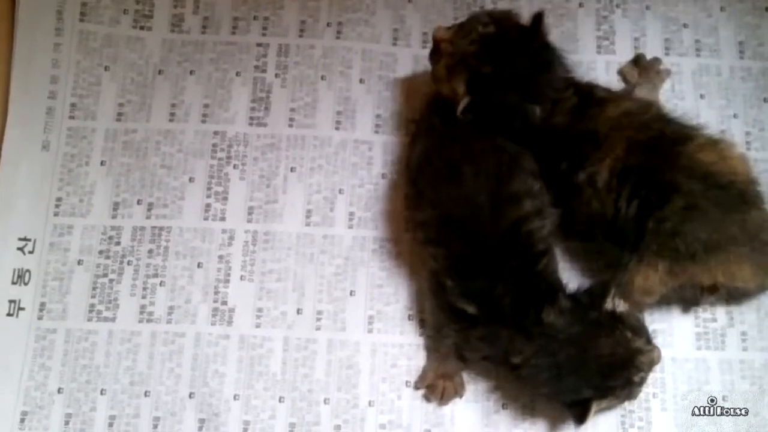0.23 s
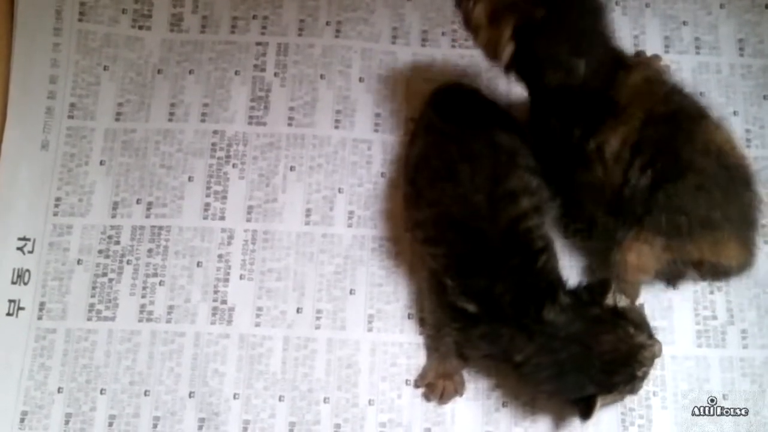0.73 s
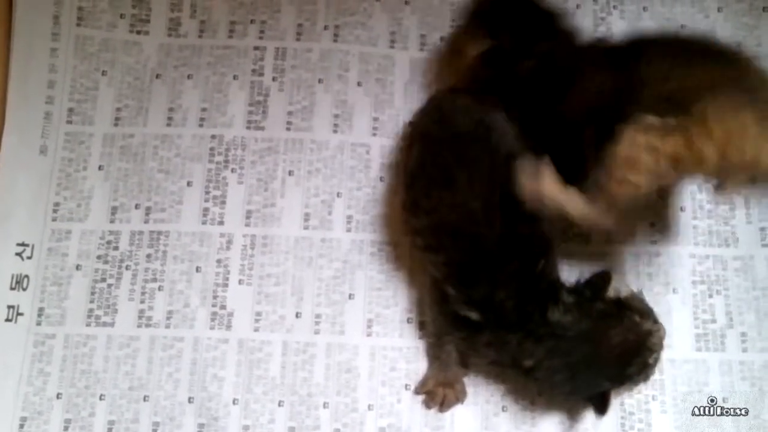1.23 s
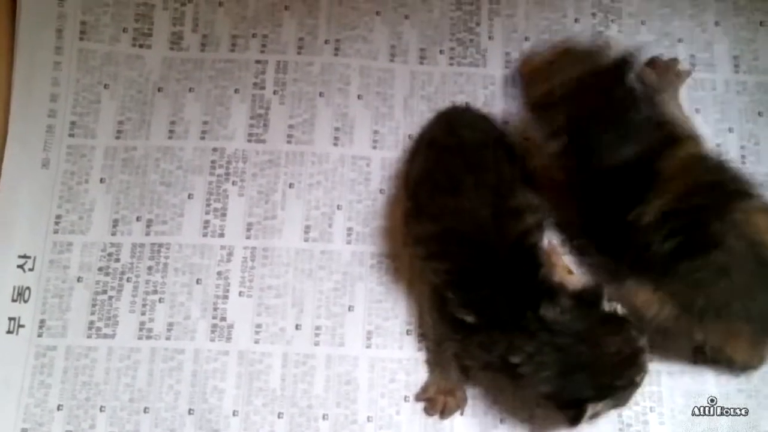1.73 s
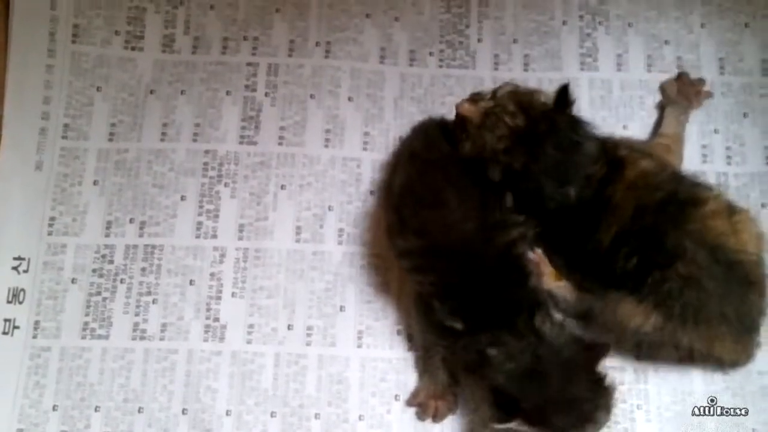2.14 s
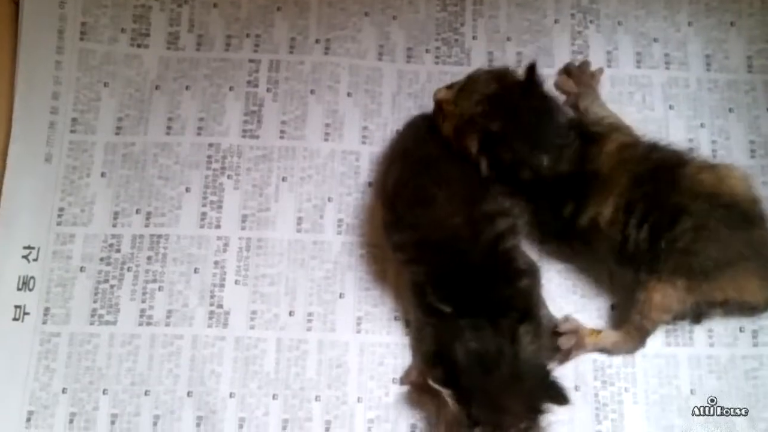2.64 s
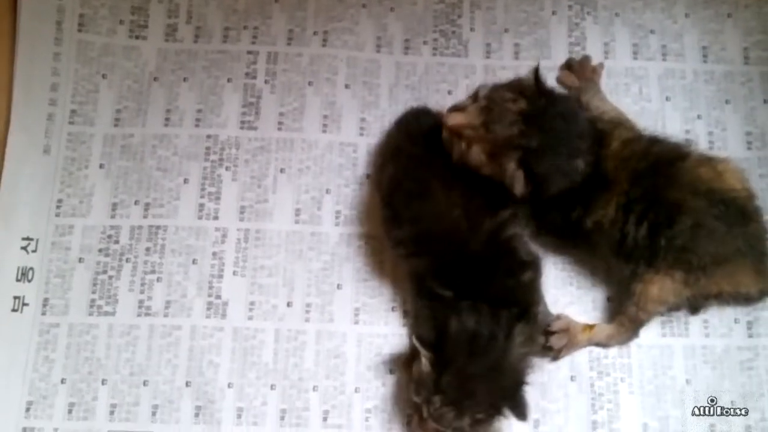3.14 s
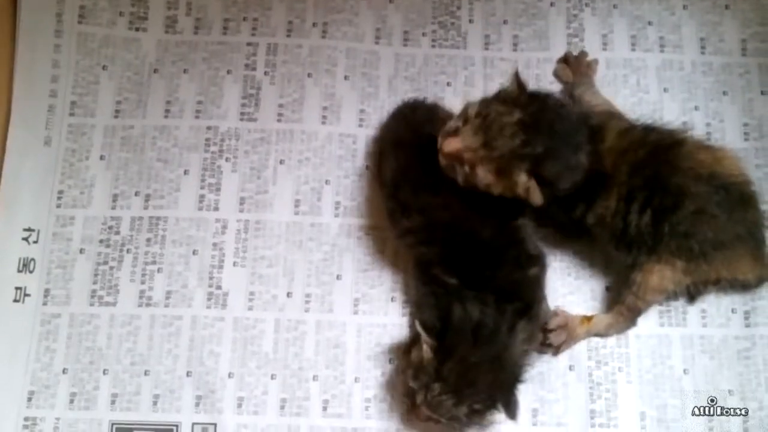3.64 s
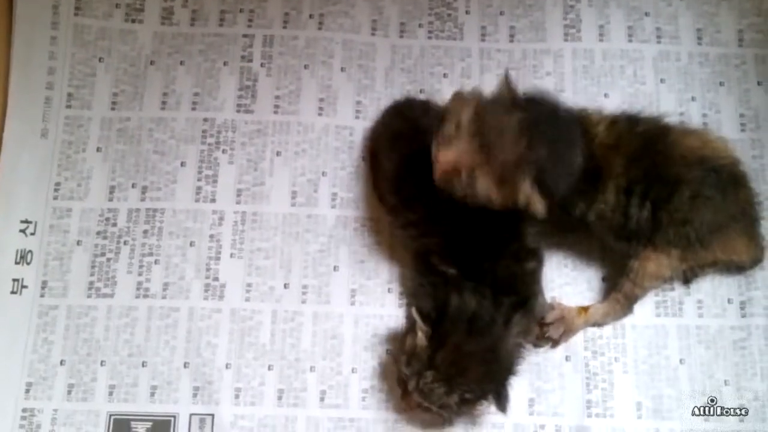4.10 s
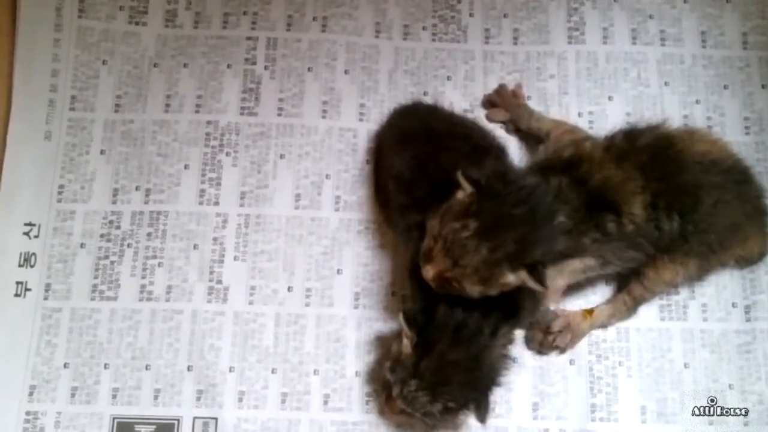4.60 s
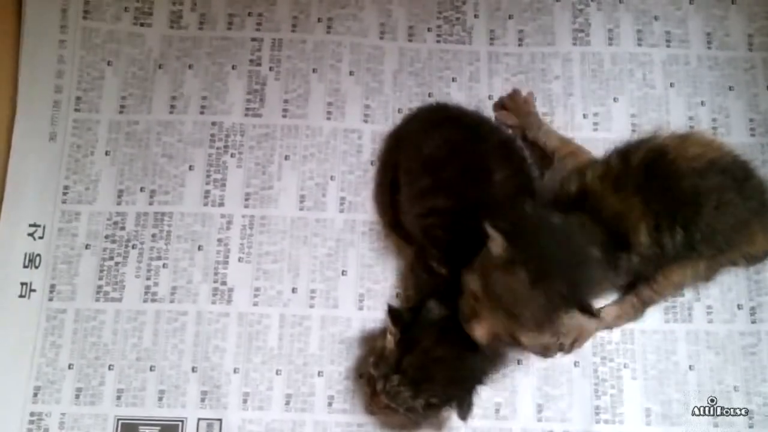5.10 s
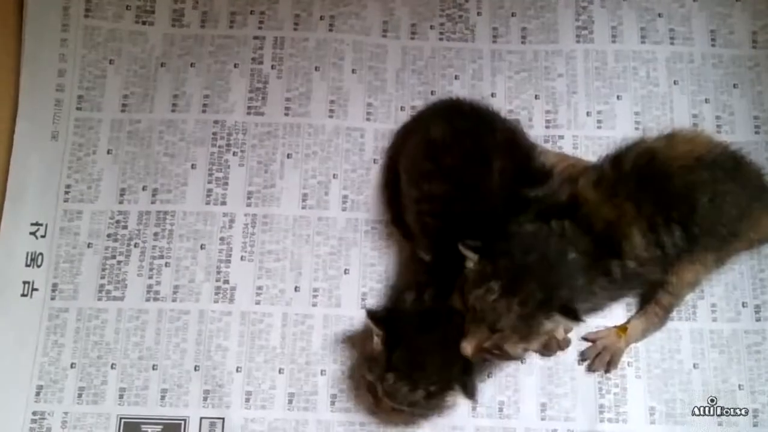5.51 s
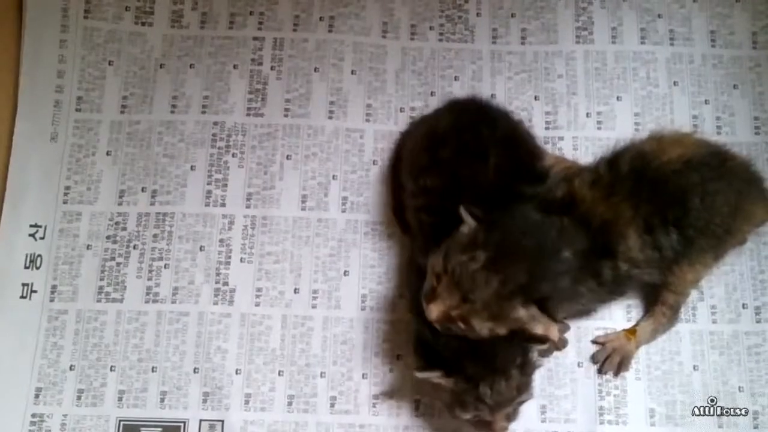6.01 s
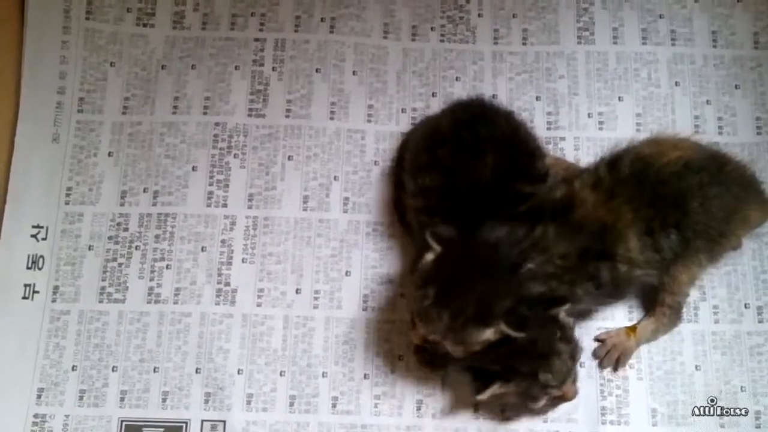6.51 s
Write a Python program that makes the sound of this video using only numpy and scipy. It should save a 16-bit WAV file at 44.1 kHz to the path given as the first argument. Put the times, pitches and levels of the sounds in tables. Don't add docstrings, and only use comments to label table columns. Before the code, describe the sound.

A small quiet room, close phone microphone, constant soft hiss and faint low machine rumble with dull bumps. At 0.2 s a newborn kitten gives a thin, loud mew, gliding up to a piercing peak and falling away by 0.7. Tiny paw ticks on newspaper follow around 0.7-1.0. A hoarse breathy onset at 1.0 leads into a second kitten's tighter, nasal answer, overlapped from 1.2 to 1.67 by the first kitten's rougher mew and a soft knock. Paper is tugged quickly at 1.74, then fur drags slowly around 2.5. A very loud, bright mew bursts out at 2.6-3.05. After a pause, the second kitten calls at 3.74-4.14, and the first overlaps at 3.9-4.35. A lull holds only hiss and faint taps near 4.8 and 5.5. One last mew arches at 5.8-6.2, followed by a firm paper scuff at 6.25 and a faint tick at 6.7.

```python
import sys
import numpy as np
from scipy import signal
from scipy.fft import rfft, irfft, next_fast_len
from scipy.io import wavfile
from scipy.ndimage import uniform_filter1d, map_coordinates

SR = 44100
rng = np.random.default_rng(int(sys.argv[2]) if len(sys.argv) > 2 else 0)


def master(y):
    cut = np.clip(np.atleast_2d(y).T, -1, 1)
    pcm = np.round(cut * 32767)
    wavfile.write(sys.argv[1], SR, pcm.astype(np.int16))


def linear_from_db(decibels):
    return 10 ** (np.asarray(decibels, float) / 20)


N = 297675

# (time [s], pitch [Hz], effort [dB], mouth opening [0-1])
CRAWLER_MEW_1 = [(0.185, 652, -43, 0.87), (0.237, 1053, -26.5, 0.65), (0.267, 1230.0, -20, 0.79),
                 (0.309, 1405, -21, 1), (0.369, 1471, -17, 1.02), (0.453, 1428, -19.5, 1),
                 (0.511, 1336.0, -22.5, 0.58), (0.575, 1113.0, -21.5, 0.2), (0.67, 649, -39.5, 0.4)]
CRAWLER_MEW_2 = [(1.215, 702.6, -44.5, 0.83), (1.306, 1118, -17, 0.81), (1.371, 1237, -16.5, 0.75),
                 (1.407, 1193, -20.5, 0.3), (1.459, 1161.0, -15.5, 0.66), (1.5, 1179, -24, 0.63),
                 (1.558, 1069, -22.5, 0.2), (1.6, 880, -29.5, 0.24), (1.668, 604, -36, 0.39)]
CRAWLER_MEW_3 = [(2.605, 712, -58, 0.64), (2.686, 1045, -24, 0.77), (2.742, 1283, -18.5, 0.73),
                 (2.789, 1400, -12, 0.76), (2.859, 1351, -13, 0.59), (2.935, 1177.0, -21, 0.32),
                 (2.981, 1009, -20.5, 0.33), (3.037, 730, -34.5, 0.18), (3.066, 678, -42, 0.23)]
CRAWLER_MEW_4 = [(3.891, 787.7, -43, 0.23), (3.946, 1050, -27.5, 0.64), (3.994, 1265, -18.5, 0.6),
                 (4.05, 1355, -15.5, 0.72), (4.128, 1321, -18, 0.57), (4.186, 1257, -21, 0.42),
                 (4.252, 1022, -28, 0.38), (4.297, 753, -31, 0.26), (4.346, 671, -46, 0.3)]
CRAWLER_MEW_5 = [(5.78, 702, -45, 0.43), (5.863, 990, -19.5, 0.6), (5.915, 1121, -20, 0.53),
                 (5.949, 1169, -21.5, 0.56), (6.008, 1188, -19.2, 0.48), (6.061, 1102, -20, 0.015),
                 (6.119, 1011.0, -22.5, 0.12), (6.168, 793, -26.5, 0.12), (6.225, 691, -39.5, 0.25)]
CRAWLER_MEWS = [CRAWLER_MEW_1, CRAWLER_MEW_2, CRAWLER_MEW_3, CRAWLER_MEW_4, CRAWLER_MEW_5]
# (time [s], pitch [Hz], effort [dB], mouth opening [0-1, below 0 is tighter])
LYING_MEW_1 = [(1.08, 653, -37, .02), (1.118, 685, -30.5, .03), (1.18, 942, -29, 0),
               (1.254, 1020, -20.5, 0), (1.302, 998, -20.5, .03), (1.352, 909, -30, -.1),
               (1.374, 802, -26.5, -.25), (1.41, 696, -26.5, -.35), (1.45, 570, -35, -.4)]
LYING_MEW_2 = [(3.742, 664, -42, -0.23), (3.802, 1004, -26.5, -0.13), (3.837, 1092, -30, 0.097),
               (3.881, 1200, -21.5, 0.16), (3.908, 1224, -18, 0.29), (4.008, 1190, -22.5, 0.23),
               (4.067, 1049, -16.5, 0.2), (4.101, 920, -15, 0.21), (4.14, 731, -45, 0.078)]
LYING_MEWS = [LYING_MEW_1, LYING_MEW_2]
# (frequency [Hz], level [dB])
CRAWLER_THROAT = [(2500, -2.5), (4000, 2), (5300, -2), (6200, -12), (7200, -6.5), (8500, -9), (9500, -24.5),
                  (11000, -14)]
LYING_THROAT = [(2500, -7.5), (4000, -16), (5300, 1.9), (6200, -9), (7200, -7), (8500, -9), (9500, -7.5),
                (11000, -36)]
# (time [s], muffling before [dB], mouth ring [dB], top overtones [dB], low partials [dB])
MOUTH_OPENS = [
    (.215, -6.5, 10.5, 11, 0.5),
    (1.25, -5, 15, 3.5, -0.5),
    (2.668, -5, 13.5, 4, 0.5),
    (3.925, -5, 18, 6, -4.5),
    (5.838, -11.5, 10.5, -4, -3.5),
    (1.175, -20, 18.5, -6.5, -4),
    (3.82, -20.5, 20, -2, -3.5),
]
# (start [s], fundamental [dB])
CHEST_FACING = [
    (.19, 2),
    (1.08, 5.5),
    (1.22, 2.5),
    (2.6, 2),
    (3.74, 0),
    (3.89, -3),
    (5.78, -1.5),
]
# (time [s], change [dB])
VOICE_CATCHES = [(.315, -4), (1.335, -4.5), (1.421, -1.5), (1.546, -8), (1.583, 0.5), (2.684, -11),
                 (2.747, -12.5), (2.901, -2.5), (3.874, -14), (3.934, 0.5), (3.972, -5.5), (4.244, -13),
                 (4.287, -14), (5.894, -12), (6.104, -10), (6.15, 4)]
# (time [s], level [dB])
BREATH_SURGES = [(.285, 2), (.343, 2), (2.674, 3), (2.735, 2), (3.915, 2), (4.19, 2.5), (5.908, 3.5),
                 (6.045, 1)]
# (start [s], end [s], level [dB], pitch [Hz])
HOARSE_STARTS = [
    (1.02, 1.1, -31, 1870),
    (3.72, 3.77, -31, 1930),
    (2.56, 2.66, -35.5, 7300),
]
# (time [s], peak [dB], pitch [Hz], time to
# fall 60 dB [s])
PAPER_CONTACTS = [(0.809, -40, 1390, 0.21), (0.878, -40, 3970, 0.14), (0.94, -40, 2320, 0.097),
                  (0.96, -41, 2220, 0.1), (1.769, -38.5, 1740, 0.074), (2.069, -45, 2400, 0.22),
                  (4.768, -45, 2160, 0.08), (5.529, -48, 1910, 0.2), (6.711, -46, 3300, 0.18),
                  (1.492, -33, 1100, .05),
    (.73, -43, 1500, .05),
    (2.05, -48, 300, .2),
    (1.03, -45, 7500, .03),
]
# (time [s], level [dB], rise [s], fade [s])
BODY_SHIFTS = [
    (1.74, -32, 0.087, 0.021),
    (2.502, -36, 0.5, 1),
    (3.7, -46.5, 0.34, 0.79),
    (6.25, -34.5, 0.41, 0.12),
]
# (frequency [Hz], level [dB per Hz])
PAPER_COLOUR = [(400, -26.5), (1000, -28.5), (2000, -16.5), (3500, -19), (6000, -22.5), (10000, -31.5)]
# (frequency [Hz], time to fall 60 dB [s])
ROOM_RING = [(500, .25), (2000, .3), (4000, .29), (9000, .2)]
# (frequency [Hz], level [dB per Hz])
HISS_COLOUR = [(180, -36), (300, -12), (647, -8.5), (719, -1.5), (901, -6.5), (1270, -3), (2030, -0.5),
               (8020, -7), (10000, -13), (10500, -14), (11000, -87), (14300, -103), (22000, -120)]
# (frequency [Hz], level [dB per Hz])
RUMBLE_COLOUR = [(8.8, -52), (15, 5), (32, -4), (48, 1), (61, -11.5), (76, -6.5), (113, -19.5), (129, -6),
                 (145, 0.5), (167, -11), (188, -3.5), (291, -11), (350, -17.5), (460, -69), (770, -120)]
# (time [s], level over the steady rumble [dB])
LOW_SWELLS = [(0, 7), (.48, -0.5), (1.4, 3), (2.83, 3.5), (4.1, 3.5), (5.38, 3), (6.5, 1)]

SHUT_HZ, MOUTH_WIDTH = 3000, .1
UPPER_WIDTH = 0.022
NOSE_HZ, NOSE_DB = 2040, 13
ROLL_OFF_DB = 0.77
TOP_GROWS = 0.4
SAG_GROWS = .7
LOW_GROWS, LOW_DB_PER_OCTAVE = 0.13, 20.5
FIRST_GROWS, FIRST_DB_PER_OCTAVE, FIRST_HZ = 0.067, 18.5, 1382
CATCH_S, SURGE_S, SWELL_S = 0.0028, .009, .06
HISS_DB, RUMBLE_DB, RUMBLE_SWAY_DB = -35, -48.5, 1
TOP_HZ = 10270


def unit(x):
    return x / np.sqrt(np.mean(x ** 2) + 1e-20)


def along(points, hz):
    f, v = np.transpose(points)
    return np.interp(np.log(hz + 1), np.log(f + 1), v)


def wobble(rate, n=N):
    knots = rng.standard_normal(int(n * rate / SR) + 4)
    return map_coordinates(knots, [np.arange(n) * rate / SR])


def filtered(x, response):
    m = next_fast_len(len(x) + 8192)
    return irfft(rfft(x, m) * response(np.fft.rfftfreq(m, 1 / SR)), m)[:len(x)]


def noise(spectrum, n=N):
    return unit(filtered(rng.standard_normal(n), lambda hz: linear_from_db(along(spectrum, hz))))


def ring(hz, centre, width):
    return 1 / (1 + (np.log(hz / centre) / width) ** 2)


def dents(rows, width_s):
    t = np.arange(N) / SR
    return linear_from_db(sum(db * np.exp(-.5 * ((t - s) / width_s) ** 2) for s, db in rows))


def mew(rows, throat, first_db, second_db, comb_db, sag_db, breath_db, echo_db, upper_ratio, upper_db):
    s, pitch, effort_db, opening = np.transpose(rows)
    t = np.arange(round(s[0] * SR), round(s[-1] * SR)) / SR
    glide = uniform_filter1d(np.interp(t, s, pitch), size=900)
    hz = glide * (1 + 0.0018 * wobble(59.4, len(t)))
    phase = 2 * np.pi * np.cumsum(hz) / SR
    drive = np.interp(t, s, effort_db)
    mouth_hz = SHUT_HZ * 2 ** np.interp(t, s, opening)
    nearest_open = min(MOUTH_OPENS, key=lambda row: abs(row[0] - s[0] - .05))
    opens, muffle_db, ring_db, top_db, low_db = nearest_open
    shut = .5 * (1 - np.tanh((t - opens) / 0.002))

    chest_db = min(CHEST_FACING, key=lambda row: abs(row[0] - s[0]))[1]
    first_lift = FIRST_GROWS * (drive + 20) + FIRST_DB_PER_OCTAVE * np.log2(hz / FIRST_HZ)
    low = low_db + LOW_GROWS * (drive + 24) + LOW_DB_PER_OCTAVE * np.log2(hz / pitch.max())
    second_nose = shut * NOSE_DB * 0.67 * ring(2 * hz, NOSE_HZ, 0.086)
    db = {1: first_db + chest_db + first_lift, 2: second_db + low + second_nose}
    for k in range(3, 12):
        mouth = ring_db * ring(k * hz, mouth_hz, MOUTH_WIDTH)
        mouth = mouth + upper_db * ring(k * hz, upper_ratio * mouth_hz, UPPER_WIDTH)
        nose = ring(k * hz, NOSE_HZ, 0.17)
        mouth = mouth + shut * (NOSE_DB * nose + muffle_db * (1 - nose))
        top = (top_db + TOP_GROWS * (drive + 18)) * (k > 4)
        db[k] = drive - ROLL_OFF_DB * (k - 3) + mouth + along(throat, k * hz) + top

    sag = sag_db * (1 - hz / np.maximum.accumulate(hz))
    comb = rng.standard_normal(SR // 200)
    tone = 0
    for k in range(2, 12):
        notch = comb_db * np.minimum(map_coordinates(comb, [k * hz / 170]), .8)
        level = db[k] + notch * max(k, 3.5) / 3.07 + sag * max(k - 4, 0) ** SAG_GROWS
        tone = tone + linear_from_db(level) * np.sin(k * phase + 2 * np.pi * rng.random())

    effort = np.sqrt(sum(linear_from_db(v) ** 2 for v in db.values()))
    puffs = 1 + np.cos(phase)
    air = linear_from_db(breath_db) * effort * puffs * noise([(900, -60.5)] + throat, len(t))
    edges = signal.windows.tukey(len(t), .05)
    cry = echoes((np.sqrt(2) * tone + air) * edges, echo_db)
    cry[:len(t)] += np.sqrt(2) * linear_from_db(db[1]) * np.sin(phase) * edges
    return cry


def echoes(x, share_db, count=9):
    kernel = np.zeros(round(.025 * SR))
    where, size = rng.random((2, count))
    kernel[(where * len(kernel)).astype(int)] = linear_from_db(share_db - 11 * where) * (2 * size - 1)
    kernel[0] = 1
    return signal.fftconvolve(x, kernel / np.linalg.norm(kernel))


def kitten(mews, **voice):
    out = np.zeros(N)
    for rows in mews:
        cry = mew(rows, **voice)
        out[round(rows[0][0] * SR):][:len(cry)] += cry
    return out


def hoarse():
    out = np.zeros(N)
    for start, end, db, hz in HOARSE_STARTS:
        n = round((end - start) * SR)
        swell = np.linspace(0, 1, n) ** 0.55 * signal.windows.tukey(n, .15)
        rush = noise([(hz / 1.46, -30), (hz, 0), (hz * 2.0, -30)], n)
        out[round(start * SR):][:n] += linear_from_db(db) * swell * rush
    return out


def paws():
    out, t = np.zeros(N + SR), np.arange(SR // 4) / SR
    for s, db, hz, t60 in PAPER_CONTACTS:
        colour = [(hz / 13.0, -25), (hz, 0), (hz * 2.6, -22), (SR / 2, -45)]
        puff = noise(colour, len(t)) * linear_from_db(-60 * t / t60)
        tick = 5.0 * np.sin(2 * np.pi * hz * t) * linear_from_db(-60 * t / 0.0057)
        out[round(s * SR):][:len(t)] += linear_from_db(db + 4) * (1.57 * puff + tick)
    return out[:N]


def scuff():
    t = np.arange(N) / SR
    drag = np.zeros(N)
    for s, db, rise, fade in BODY_SHIFTS:
        drag += linear_from_db(db) * np.exp(-np.abs(t - s) / np.where(t < s, rise, fade))
    clumps = unit(linear_from_db(1.2 * wobble(12) + 3 * wobble(90)))
    return drag * clumps * noise(PAPER_COLOUR)


def room(x):
    out, hop = np.zeros(N + SR), 13230
    for start in range(0, N, hop):
        hz, t, z = signal.stft(rng.standard_normal(SR // 2), SR, nperseg=256)
        fade = linear_from_db(-60 * t / along(ROOM_RING, hz)[:, None])
        tail = signal.istft(z * fade, SR, nperseg=256)[1]
        wet = signal.fftconvolve(x[start:start + hop], tail / np.linalg.norm(tail))
        out[start + 150:][:len(wet)] += wet
    return out[:N]


def microphone_hiss():
    return linear_from_db(HISS_DB - 2.0 + 0.52 * wobble(3.02)) * noise(HISS_COLOUR)


def distant_rumble():
    sway = linear_from_db(RUMBLE_DB + RUMBLE_SWAY_DB * wobble(1.7))
    return sway * dents(LOW_SWELLS, SWELL_S) * noise(RUMBLE_COLOUR)


def scene():
    cries = kitten(CRAWLER_MEWS, throat=CRAWLER_THROAT, first_db=-30, second_db=-21.5, breath_db=-32.5,
                   echo_db=-11.5, upper_ratio=1.787, upper_db=3, comb_db=3.1, sag_db=-24)
    cries += kitten(LYING_MEWS, throat=LYING_THROAT, first_db=-35.5, second_db=-19.5, breath_db=-31,
                    echo_db=-8, upper_ratio=2.27, upper_db=15.5, comb_db=2.2, sag_db=-60)
    cries *= dents(VOICE_CATCHES, CATCH_S) * dents(BREATH_SURGES, SURGE_S)
    near = cries + paws() + hoarse()
    mix = near + linear_from_db(-11.0) * room(near) + scuff() + microphone_hiss() + distant_rumble()
    return mix[None]


def thinned(x, under_db, slope, quiet_db, scatter_db, grain_db):
    hz, t, z = signal.stft(x, SR, nperseg=2048)
    band = np.floor(19 * np.log(1 + hz / 2000) + np.maximum(hz - 8800, 0) / 300).astype(int)
    power = np.abs(z) ** 2
    level = np.array([power[band == b].mean(axis=0) for b in range(band[-1] + 1)])
    bar = np.maximum(linear_from_db(2 * under_db) * power.sum(axis=0) ** slope, linear_from_db(2 * quiet_db))
    keep = level > bar * linear_from_db(2 * scatter_db * rng.standard_normal(level.shape))
    keep[:2] = True
    turns = np.exp(2j * np.pi * rng.random(z.shape))
    grain = linear_from_db(grain_db) * np.sqrt(level[band]) * turns
    return signal.istft((z + grain) * keep[band], SR, nperseg=2048)[1][:N]


def band_limit(x):
    return signal.sosfilt(signal.butter(12, 15630, fs=SR, output="sos"), x)


def record(dry):
    squeezed = dry[0] / (1 + np.abs((dry[0] + 0.046) / 1.184) ** 5) ** (1 / 5)
    narrow = filtered(squeezed, lambda hz: 1 / (1 + (hz / TOP_HZ) ** 40))
    thin = thinned(narrow, under_db=-61.5, slope=0.48, quiet_db=-82, scatter_db=1.2, grain_db=-17)
    clipped = np.clip(thin, -1.01, 1.01)
    return band_limit(clipped[None])


dry = scene()
out = record(dry)
master(out)
```